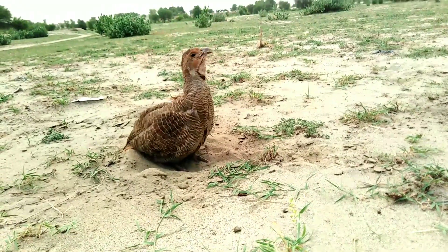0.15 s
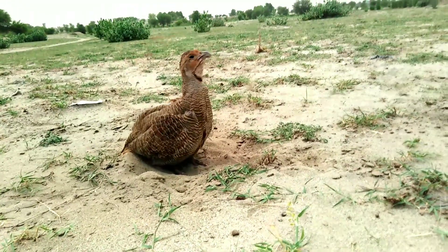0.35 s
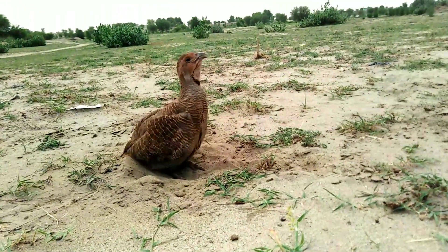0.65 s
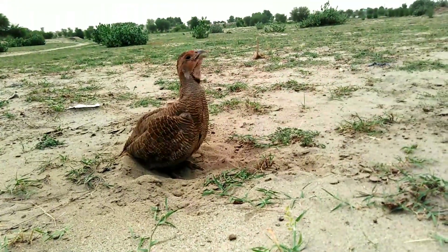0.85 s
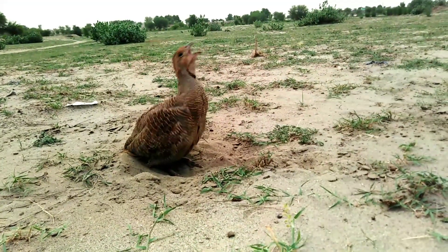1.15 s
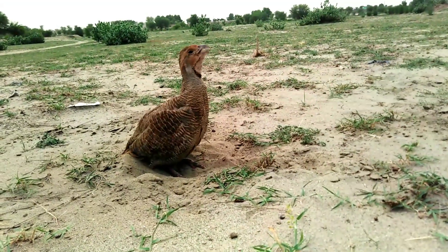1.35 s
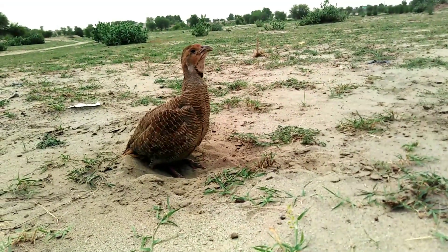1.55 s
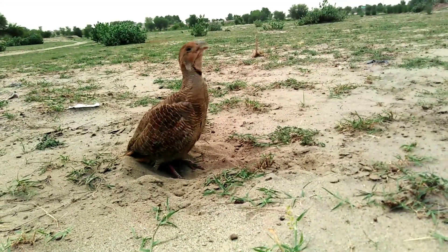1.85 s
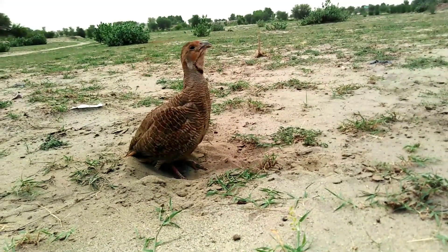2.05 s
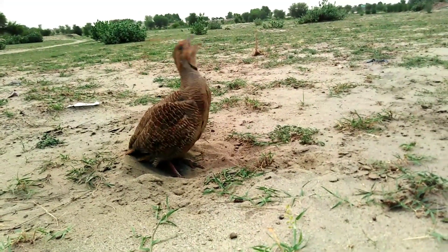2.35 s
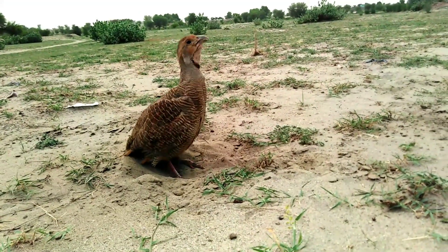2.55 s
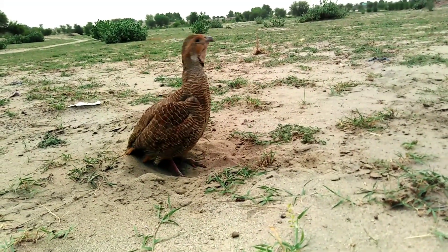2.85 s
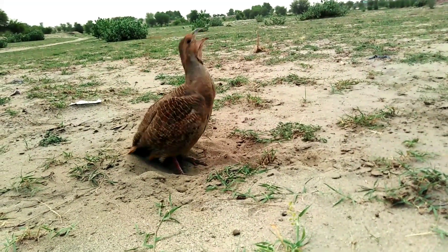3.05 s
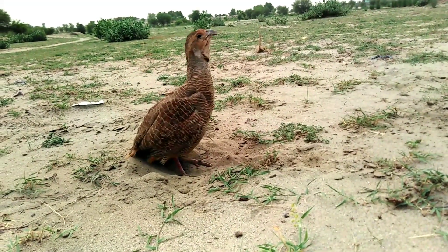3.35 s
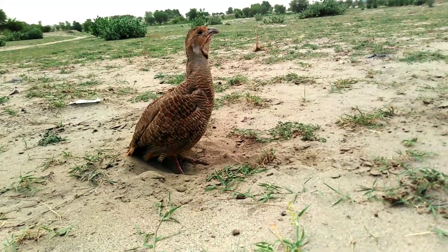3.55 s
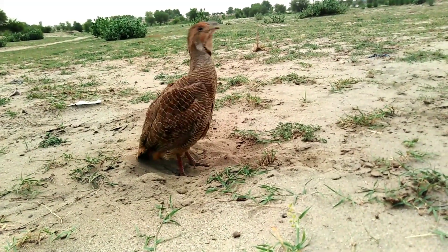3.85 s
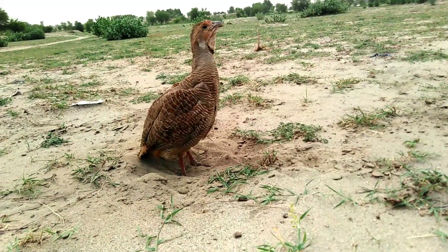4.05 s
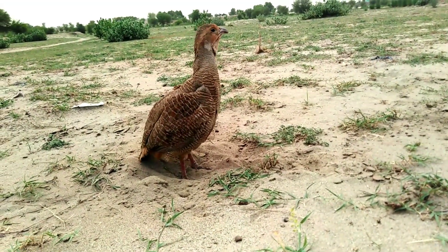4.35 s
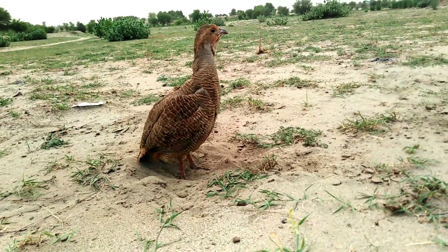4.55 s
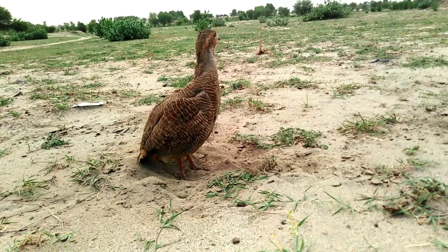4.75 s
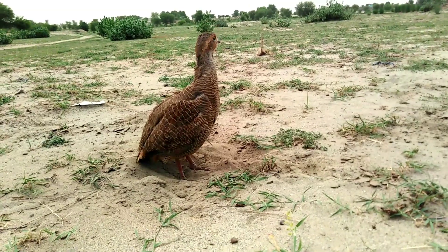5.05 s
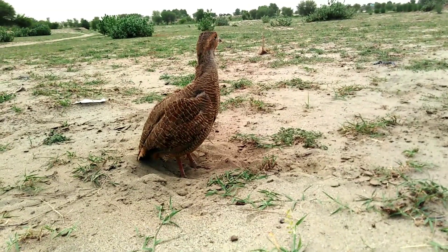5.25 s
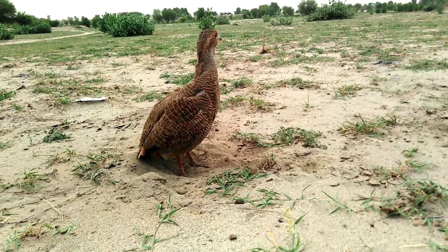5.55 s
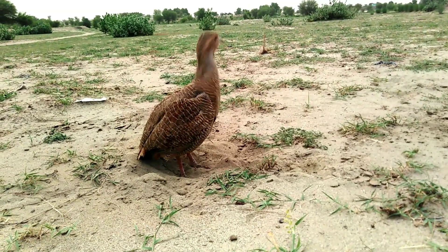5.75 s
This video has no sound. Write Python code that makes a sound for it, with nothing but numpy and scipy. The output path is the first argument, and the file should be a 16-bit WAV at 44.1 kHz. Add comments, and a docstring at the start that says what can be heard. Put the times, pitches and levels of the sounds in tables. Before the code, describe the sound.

Opening on the tail of a rasp, a francolin runs through rapid, strident call cycles on open sandy ground: cluck, grunt, piercing whistle, gritty rasp. The close stereo pickup is hot and slightly squashed, with little echo. The last cycle lacks the whistle and rasp, ending in a brief creak, then faint wind, insects and a far trill.

```python
"""Francolin on sandy ground

A grey francolin repeats a harsh cluck, a grunt, a loud whistle and a long rasp close by, then runs down to a low creak.
Harmonics, chaotic pitch and pulsed noise make the harsh voice; a wavering sine with a skirt of hiss makes the whistle.
Sand and field scatter the calls as decaying noise. Coloured noise makes the wind bumps, insects, wash and two grit
ticks, and a warbled sine makes a far bird's trill. The recorder's limiter holds each channel to full scale."""
import sys
import numpy as np
from scipy import signal
from scipy.fft import rfft, irfft, next_fast_len
from scipy.io import wavfile
from scipy.ndimage import uniform_filter1d, minimum_filter1d, map_coordinates

SR = 44100
rng = np.random.default_rng(int(sys.argv[2]) if len(sys.argv) > 2 else 0)


def digitize_waveform(pressure):
    """Quantize a signal to 16-bit integers and store it at the path in sys.argv[1].

    Rows of a 2-D input are taken as channels; values are limited to [-1, 1].
    """
    field = np.atleast_2d(pressure).T
    bounded = np.clip(field, -1, 1)
    quanta = np.round(bounded * 32767).astype(np.int16)
    wavfile.write(sys.argv[1], SR, quanta)


N = 261072  # length in samples

# Faint wash that hangs behind the calls and fades after them: t/s, level/dB
WASH_LEVEL = [(0, -52), (4.25, -53.5), (4.6, -63), (5.2, -76), (5.92, -72)]
# Colour of the wash: f/Hz, relative level/dB
WASH_COLOUR = [(300, 9), (900, 1), (2000, -1), (3500, -4), (6000, -2), (9000, -12), (14000, -10.5)]
# Colour of the insect band: f/Hz, relative level/dB
INSECT_COLOUR = [(1470, -66.5), (2500, -27), (3480, -24), (3640, -12.5), (4320, -18), (4480, -0.5),
                 (4750, -2), (5850, 0.5), (7160, -37.5), (14000, -29.5)]
# Swell of the wind: t/s, relative level/dB
WIND_LEVEL = [(0.0, -39), (0.16, -59), (0.92, -46), (1.02, -29.5), (1.52, -37.5), (1.65, -55.5),
              (1.83, -32.5), (2.77, -42), (3.59, -32.5), (3.94, -46.5), (4.39, -33), (4.65, -45.5),
              (4.7, -42), (4.83, -44), (5.31, -32), (5.75, -44), (5.8, -31), (5.92, -51)]
# Colour of the wind rumble: f/Hz, relative level/dB
RUMBLE_COLOUR = [(25, -36.5), (55, -5.5), (90, 3.5), (140, -1), (300, -24), (450, -35.5), (800, -53.5),
                 (1500, -60), (3000, -70.5), (8000, -87.5)]
# Soft low wind bumps: t/s, relative level/dB
WIND_BUMPS = [(1.34, -13), (4.422, -19.5), (4.694, -12.5), (4.717, -20), (5.23, -8), (5.488, -15),
              (5.807, -21.5)]
# Colour of a bump: f/Hz, relative level/dB
BUMP_COLOUR = [(40, -30.5), (100, 8.5), (190, 2.5), (330, -14.5), (700, -60), (1500, -62.0), (6000, -97)]
# Wind balance between the ports: f/Hz, left minus right level/dB
WIND_BALANCE = [(60, -23.5), (150, -17), (400, -10.5), (900, 0)]
# Grit ticks: t/s, relative level/dB
GRIT_TICKS = [(4.9061, -7.5), (4.948, -9)]
# Colour of a tick: f/Hz, relative level/dB
GRIT_COLOUR = [(410, -46), (700, -29), (756, -20), (5710, -6), (6830, 0.5), (10700, 1), (13500, -2.5),
               (14900, -23)]
# Far bird: start t/s, end t/s, centre f/Hz, level/dB halfway through a warble
FAR_TRILLS = [(4.246, 4.377, 2620, -55), (4.676, 4.786, 2673, -53.5), (5.901, 5.99, 2350, -58.5)]
# Decay of the field scatter: f/Hz, t60/s
FIELD_DECAY = [(200, 0.53), (1000, 1), (3000, 0.15), (5000, 0.35), (12000, 0.73)]
# Colour of the field scatter: f/Hz, relative level/dB
FIELD_COLOUR = [(150, -4.5), (500, 16.5), (1100, 12), (2000, -5), (3200, 12), (5000, 7.5), (7000, -2),
                (9000, -6.5), (12000, -2.5)]
# Rough sand scatters the treble most: f/Hz, level under the direct call/dB
SAND_SCATTER = [(1000, -15), (4500, -6), (8000, 1.5), (13000, -3.5)]
# Colour difference of the ports for the harsh calls: f/Hz, left minus right level/dB
PORT_BALANCE = [(60, -13.5), (110, -5), (200, -15.5), (370, -2.5), (690, 3), (1260, -8), (2320, -7),
                (4280, 8.5), (7870, -12), (14500, -8)]
# Phase difference of the ports for the harsh calls: f/Hz, left lead/rad
PORT_PHASE = [(0, 0), (1200, -2.3), (1600, -3.7), (1800, -6.6), (2750, -7), (3250, -8.8), (4000, -9.7),
              (6000, -12.7), (7000, -15.2), (9100, -19.2), (10200, -25), (14600, -32.5)]

# Whistles: start t/s, release t/s, end t/s, base f/Hz, waver f/Hz, upward step t/s, step f/Hz
WHISTLES = [(0.323, .46, .508, 3516, 29, .469, 346), (0.952, 1.137, 1.22, 3432, 4, 1.105, 136.3),
            (1.592, 1.756, 1.79, 3517, 2, 1.69, 80.3), (2.21, 2.368, 2.408, 3596, 25, 2.41, 117),
            (2.843, 2.862, 2.886, 3563, -0.5, 2.857, 203), (2.88, 3.084, 3.1, 3534, -15.5, 2.4, 30),
            (3.569, 3.777, 3.825, 3457, 6.5, 3.687, 133.3)]
# Colour of the hiss that rides on the whistle: f/Hz, relative level/dB
WHISTLE_HISS = [(300, -15.5), (1700, -8.5), (2400, -11), (3000, 6), (4000, -2), (4350, -8), (5100, 2),
                (6100, -4), (6800, -11.5), (9000, -20), (14000, -31.5)]

# The four harsh notes share columns: start t/s, end t/s, top f/Hz, relative level/dB, half-pitch undertone level/dB
# Clucks
CLUCKS = [(.168, .236, 1950, -12.5, -13.5), (.784, .852, 2079, -11.5, -31),
          (1.405, 1.478, 2130, -12.5, -28.5), (2.025, 2.098, 2112, -13, -30.5),
          (2.674, 2.748, 2093, -13.5, -23.5), (3.363, 3.437, 2052, -13.5, -20.5),
          (4.043, 4.12, 2046, -13.5, -26.5)]
# Softer, swelling grunts, most of which lead into a whistle
GRUNTS = [(.286, .345, 1252, -14, -11), (.907, .972, 1961, -10, -9.5), (1.531, 1.597, 2022, -9.5, -22),
          (2.153, 2.218, 2004, -10, -9.5), (2.803, 2.876, 1919, -11.5, -19), (3.491, 3.56, 1876, -13, -5.5),
          (4.173, 4.243, 1797, -14.5, -3.5)]
# Long rasping notes
RASPS = [(-.107, .06, 2486, -11, -27.5), (.505, .669, 2515, -10, -46.5), (1.116, 1.288, 2496, -9.5, -51),
         (1.738, 1.906, 2503, -8, -40), (2.388, 2.556, 2496, -9.5, -35.5), (3.074, 3.246, 2483, -10, -39.5),
         (3.758, 3.931, 2489, -10, -33.5)]
# The closing low creak
CREAK = [(4.323, 4.381, 370.1, -28, -15)]
# Throat resonances with the beak half open: f/Hz, relative level/dB
HALF_OPEN_BEAK = [(300, -7), (650, -16.5), (950, -4.5), (1250, -5.5), (1550, 3.5), (2100, -2),
                  (2500, -10.5), (3000, 3), (3550, -7), (4100, -2), (4750, -10), (5750, 1), (6700, -21),
                  (8600, -42), (10000, -13.5), (14500, -36.5)]
# Throat resonances with the beak wide open: f/Hz, relative level/dB
OPEN_BEAK = [(300, -30), (750, -23), (1400, 4), (1800, -0.5), (2300, 3), (3300, -6), (4200, -0.5),
             (5300, 1.5), (6500, -12.5), (7400, -15.5), (8400, -36.5), (9900, -19), (12300, -25.5),
             (14500, -30.5)]
# Throat resonances with the beak nearly shut: f/Hz, relative level/dB
SHUT_BEAK = [(220, -23), (370, 4.5), (560, -10), (1050, 5), (1600, 1.5), (2200, -21), (2700, -11.5),
             (3200, -27), (3800, -11), (4500, -40), (12000, -38)]
# Turbulence in the syrinx, brighter than the tone: f/Hz, relative level/dB
AIR_COLOUR = [(250, -22), (900, -9.5), (2000, -3.5), (5800, 18), (6700, -8.5), (7900, 10), (8600, -22),
              (9700, 0.5), (12300, 10), (14500, -19)]
# Stretches where the chaotic voice locks to a pitch, columns: from/share of note, to/share of note,
# pitch before the sag/top pitch, added level/dB, roughness/0-1
# Clucks
CLUCK_LOCKS = [(.15, .26, .5, 2, .36), (.3, .46, .78, 3.5, .17), (.54, .84, 0.99, 4, .05)]
# Grunts
GRUNT_LOCKS = [(.35, .49, .71, 0.045, 0.19), (.55, .85, 0.97, 0.86, .09)]
# Rasps
RASP_LOCKS = [(.055, .125, .72, 6.3, .16), (.275, .425, 0.99, 11, .03), (.595, .895, 0.97, 5.5, 0.022)]
# Pitch arches, columns: starting pitch/top pitch, peak/share of note, sag/share of pitch, power of the sag,
# release/share of note, final pitch/pitch at release
# Clucks
CLUCK_ARCH = (.22, .6, .14, 2.2, .85, .15)
# Grunts
GRUNT_ARCH = (.15, .6, .11, 2.4, .86, .18)
# Rasps
RASP_ARCH = (.95, .62, .165, 1.3, .895, .22)
# The creak
CREAK_ARCH = (.63, .35, .38, 1.8, .88, .88)

GUSTINESS_DB, BUMP_ATTACK_S = 2.5, .006  # quick random swings of the wind, rise of a bump
TRILL_FLUTTER_DB = 4  # the far bird is softer at the top of each warble
TOP_HZ = 14450  # upper band limit of the voice and the recorder
WHISTLE_DB, WHISTLE_EDGE_S, WHISTLE_FADE_DB_PER_S = -4, 0.014, 259  # held tone at the left port, end ramps, release
WHISTLE_TAIL_DB = -7.5  # after its release a whistle lingers this far under its held level, under the rasp
SCOOP_HZ, SCOOP_S, CLIMB_HZ_PER_S = 64, 0.018, 67  # a whistle slides up into its pitch, then creeps higher
WAVER_S, STEP_S = 0.084, .02  # period of the slow waver, half-length of the upward step
# The right port lies in a notch that the whistle climbs out of: level against the left at a pitch, and its rise
RIGHT_DB, RIGHT_AT_HZ, RIGHT_DB_PER_HZ = -15, 3509, 0.02
LOCK_EDGE = .035  # share of the note that locking on or off takes
NOTE_SPREAD = 0.011  # typical random shift of a note's middle, as a share of its length
AIR_WITH_CHAOS_DB = 6.5  # extra turbulence at full roughness
CHAOS_NOISE = .25  # noise share of power in a rasp at full roughness


def amp(db):
    """Decibels to gain."""
    return 10 ** (np.asarray(db) / 20)


def unit(x):
    """Scale to rms 1."""
    return x / np.sqrt(np.mean(x ** 2) + 1e-20)


def along(points, hz):
    """Read (f/Hz, value) points on a log frequency axis."""
    f, v = np.transpose(points)
    return np.interp(np.log(hz + 1), np.log(f + 1), v)


def curves(rows, at):
    """Join each column after the first by straight lines."""
    s, *cols = np.transpose(rows)
    return [np.interp(at, np.sort(s), c) for c in cols]


def wobble(rate, size):
    """A smooth random curve with rate knots a second."""
    knots = rng.standard_normal(int(size * rate / SR) + 4)
    return map_coordinates(knots, [np.arange(size) * rate / SR])


def filtered(x, response):
    """Shape x by a response over frequency."""
    size = x.shape[-1]
    m = next_fast_len(size + 4096)  # padding leaves room for the filter's ring
    return irfft(rfft(x, m) * response(np.fft.rfftfreq(m, 1 / SR)), m)[..., :size]


def noise(spectrum, shape):
    """Coloured noise of rms 1."""
    return unit(filtered(rng.standard_normal(shape), lambda hz: amp(along(spectrum, hz))))


def add(track, s, x):
    """Mix x into the track from time s on, cut at the track's ends."""
    i = round(s * SR)
    a, b = max(i, 0), min(i + x.shape[-1], N)
    track[..., a:b] += x[..., a - i:b - i]


def panned(db):
    """Left and right gains of mean power 1, from left minus right dB."""
    g = np.array([amp(db / 2), amp(-db / 2)])
    return g / np.sqrt(np.mean(g ** 2, axis=0))


def wash():
    """Soft, slightly uneven broadband hiss."""
    db = curves(WASH_LEVEL, np.arange(N) / SR)[0]
    return amp(db + 1.2 * wobble(37, N)) * noise(WASH_COLOUR, (2, N))


def insects(db=-65):
    """A nearly steady band of noise from far insects."""
    return amp(db + .8 * wobble(7.4, N)) * noise(INSECT_COLOUR, (2, N))


def wind(bump_t60=0.062):
    """Unrelated low buffeting at each port, mostly the right one, with a few soft bumps."""
    db = curves(WIND_LEVEL, np.arange(N) / SR)[0]
    out = amp(db + 2.5 + GUSTINESS_DB * wobble(22, N)) * noise(RUMBLE_COLOUR, (2, N))
    t = np.arange(SR // 6) / SR
    bump_envelope = (1 - np.exp(-(t / BUMP_ATTACK_S) ** 2)) * amp(-60 * t / bump_t60)
    for s, bump_db in WIND_BUMPS:
        push = noise(BUMP_COLOUR, (2, len(t)))
        add(out, s, amp(bump_db + 4.0) * push * bump_envelope)
    return filtered(out, lambda hz: panned(along(WIND_BALANCE, hz)))


def far_bird(trill_hz=39, swing_hz=230):
    """A faint sine whose pitch warbles quickly and whose level dips at each high."""
    out = np.zeros(N)
    for start, end, centre_hz, db in FAR_TRILLS:
        t = np.arange(int((end - start) * SR)) / SR
        beat = np.sin(2 * np.pi * trill_hz * t + .5 * wobble(30, len(t)))
        hz = centre_hz + swing_hz * beat + 40 * wobble(533, len(t))
        tone = np.sin(2 * np.pi * np.cumsum(hz) / SR)
        add(out, start, amp(db - TRILL_FLUTTER_DB * beat) * tone * signal.windows.tukey(len(t), .3))
    return np.array([out, out])


def grit(t60=0.0063):
    """Two sharp, fast-dying noise ticks, near the right port."""
    out = np.zeros((2, N))
    t = np.arange(SR // 20) / SR
    for s, db in GRIT_TICKS:
        tick = noise(GRIT_COLOUR, (2, len(t))) * amp(-60 * t / t60)
        add(out, s, amp(db - 2) * tick / np.abs(tick).max(axis=1, keepdims=True))
    return out * panned(-23)[:, None]


def field(x):
    """Scatter from ground and bushes: a noise tail that decays at its own rate in each band."""
    hz, t, z = signal.stft(rng.standard_normal((2, SR)), SR, nperseg=256)
    z = z * amp(along(FIELD_COLOUR, hz)[:, None] - 60 * t / along(FIELD_DECAY, hz)[:, None])
    tail = signal.istft(z, SR, nperseg=256)[1]
    return signal.fftconvolve(x, tail / np.linalg.norm(tail[0]), axes=1)[:, :N]


def ground(x, t60=0.037):
    """Rough sand scatters the call briefly to each port; the pattern drifts as the bird moves its head."""
    t = np.arange(SR // 16) / SR
    scatter = rng.standard_normal((2, 2, len(t))) * amp(-60 * t / t60)
    scatter = scatter / np.linalg.norm(scatter, axis=2, keepdims=True)
    one, other = signal.fftconvolve(x[None], scatter, axes=2)[..., :N]
    turn = 2 * wobble(2.4, N)  # radians of blend between the two patterns
    drifting = np.cos(turn) * one + np.sin(turn) * other
    return x + filtered(drifting, lambda hz: amp(along(SAND_SCATTER, hz)))


def at_ports(x):
    """The two ports hear the bird with different delay and colour."""
    def response(hz):
        lead = curves(PORT_PHASE, hz)[0]
        return panned(along(PORT_BALANCE, hz)) * np.exp(1j * lead * np.array([[1], [0]]))
    return filtered(x, response)


def whistles(lag_s=0.00037, hiss_db=-26):
    """A nearly pure tone that climbs slowly, in most whistles with an upward step, and carries a skirt of hiss."""
    out = np.zeros((2, N))
    for start, release, end, base_hz, waver_hz, step_s, step_hz in WHISTLES:
        t = np.arange(int((end - start) * SR)) / SR
        hz = base_hz + CLIMB_HZ_PER_S * t - SCOOP_HZ * np.exp(-t / SCOOP_S)
        hz = hz - waver_hz * np.cos(2 * np.pi * t / WAVER_S)
        hz = hz + step_hz * (1 + np.tanh((start + t - step_s) / STEP_S)) / 2
        right_db = np.minimum(RIGHT_DB + RIGHT_DB_PER_HZ * (hz - RIGHT_AT_HZ), 0)
        hz = hz * (1 + 0.0055 * wobble(360, len(t)))
        # the left port lags the right
        phase = 2 * np.pi * (np.cumsum(hz) / SR - hz * np.array([[lag_s], [0]]))
        flutter_db = .25 * wobble(190, len(t)) + 0.48 * wobble(35, len(t))
        tone = np.sqrt(2) * np.sin(phase) * amp(right_db * np.array([[0], [1]]) + flutter_db)
        hiss = amp(hiss_db) * noise(WHISTLE_HISS, (2, len(t))) * panned(4.4)[:, None]
        fade_db = np.maximum(-WHISTLE_FADE_DB_PER_S * np.maximum(start + t - release, 0), WHISTLE_TAIL_DB)
        gate = np.clip(np.minimum(t, t[-1] - t) / WHISTLE_EDGE_S, 0, 1)
        add(out, start, gate * amp(WHISTLE_DB + fade_db) * (tone + hiss))
    return out


def note_shape(locks, start_ratio, peak, sag, bend, release, end_ratio,
               attack, attack_db, sag_db, release_db, rough):
    """One push of air: pitch peaks, sags and collapses in the release; the voice is rough except where it locks.

    Times are shares of the note. Gives rows: share, pitch/top pitch, level/dB, roughness/0-1."""
    u = np.linspace(0, 1, 400)
    ratio = np.interp(u, [0, peak], [start_ratio, 1])
    sagging = np.interp(u, [peak, release], [0, 1])
    collapse = np.interp(u, [min(release, .98), 1], [0, 1])
    db = attack_db * np.exp(-u / attack) + sag_db * sagging + release_db * collapse
    for begin, end, lock_ratio, lock_db, lock_rough in locks:
        inside = np.minimum(u - begin, end - u) / LOCK_EDGE
        locked = np.clip(inside + .5, 0, 1)
        pitch_locked = np.clip(2 * inside + 2, 0, 1)  # the pitch jumps while the voice is still rough
        ratio = ratio + pitch_locked * (lock_ratio - ratio)
        rough = rough + locked * (lock_rough - rough)
        db = db + locked * lock_db
    ratio = ratio * (1 - sag * sagging ** bend) * end_ratio ** collapse
    return np.transpose(np.broadcast_arrays(u, ratio, db, rough))


def octaves_above(hz):
    """Octaves over the main resonance, zero below it."""
    return np.log2(np.maximum(hz / 2200, 1))


def notes(table, shape, tract, jitter, jitter_rate, flutter_db, rasp, air_db, tilt_db, dull):
    """The syrinx jumps between clean and chaotic vibration; its harmonics sweep through the fixed throat."""
    out = np.zeros(N)
    for start, end, top_hz, db, under_db in table:
        size = int((end - start) * SR)
        u = np.linspace(0, 1, size)
        shift = NOTE_SPREAD * rng.standard_normal() * np.sin(np.pi * u) ** 2
        ratio, level_db, rough = curves(shape, u + shift)
        chaotic = np.clip(rough - .08, 0, 1)  # below this threshold the vibration locks to a clean pitch
        hz = top_hz * np.abs(ratio) * np.exp(jitter * chaotic * wobble(jitter_rate, size))
        phase = 2 * np.pi * np.cumsum(hz) / SR

        # less effort dulls the voice; roughness tilts its treble too
        effort_db = db + level_db + 8.5
        slope_db = dull * np.maximum(effort_db, -12) + tilt_db * rough  # dB per octave

        # odd multiples of half the pitch appear when every second cycle is weaker
        k = np.arange(1, 41)[:, None] / 2
        partial_hz = k * hz
        partial_db = along(tract, partial_hz) + slope_db * octaves_above(partial_hz) + (k % 1 > 0) * under_db
        gain = amp(partial_db) * (partial_hz < TOP_HZ)
        gain = gain / np.sqrt(np.sum(gain ** 2, axis=0) / 2)
        tone = np.sum(gain * np.sin(k * phase + rng.uniform(0, 2 * np.pi, k.shape)), axis=0)
        tone = tone * amp(flutter_db * rough * wobble(700, size))

        gate = 1 + np.cos(phase)  # turbulence is let through once a cycle
        noise_share = np.clip(rasp * rough ** 2, 0, 1)
        chaos_colour = [(f, g + slope_db.mean() * octaves_above(f)) for f, g in tract]
        chaos = np.sqrt(noise_share) * noise(chaos_colour, size)
        air = amp(air_db + dull * effort_db + AIR_WITH_CHAOS_DB * rough) * noise(AIR_COLOUR, size)
        voice = np.sqrt(1 - noise_share) * tone + gate * (chaos + air)
        add(out, start, amp(db + level_db) * voice)
    return out


def harsh_calls():
    """Clucks, grunts, rasps and the closing creak: one syrinx with a pitch arch and beak opening for each."""
    cluck = note_shape(CLUCK_LOCKS, *CLUCK_ARCH, attack=0.047, attack_db=-33.5, sag_db=-3.5,
                       release_db=-24, rough=.52)
    grunt = note_shape(GRUNT_LOCKS, *GRUNT_ARCH, attack=0.092, attack_db=-23, sag_db=-5.5,
                       release_db=-17.5, rough=.58)
    rasp = note_shape(RASP_LOCKS, *RASP_ARCH, attack=.025, attack_db=-13.5, sag_db=-3.5,
                      release_db=-17, rough=0.58)
    creaking = note_shape([], *CREAK_ARCH, attack=.04, attack_db=-10.5, sag_db=-4.0,
                          release_db=-8, rough=0.073)
    clucks = notes(CLUCKS, cluck, HALF_OPEN_BEAK, jitter=0.3, jitter_rate=800, flutter_db=6.0,
                   rasp=0.18, air_db=-21, tilt_db=0.5, dull=1.0)
    grunts = notes(GRUNTS, grunt, HALF_OPEN_BEAK, jitter=0.23, jitter_rate=1000, flutter_db=3,
                   rasp=0.027, air_db=-15.0, tilt_db=-3.5, dull=1.0)
    rasps = notes(RASPS, rasp, OPEN_BEAK, jitter=0.2, jitter_rate=440, flutter_db=10.5,
                  rasp=CHAOS_NOISE, air_db=-22, tilt_db=-4.0, dull=0.75)
    creak = notes(CREAK, creaking, SHUT_BEAK, jitter=0.07, jitter_rate=1100, flutter_db=17.0,
                  rasp=0.28, air_db=-37, tilt_db=-4.0, dull=0.107)
    return ground(at_ports(clucks + grunts + rasps + creak))


def scene():
    """The francolin in front, over field scatter, wash, wind, insects, a far bird and grit."""
    voice, whistle, far, ticks = harsh_calls(), whistles(), far_bird(), grit()
    echo = field(amp(-40.5) * voice + amp(-45.5) * whistle + far + amp(-21.0) * ticks)
    return voice + whistle + far + ticks + echo + wash() + wind() + insects()


def record(dry, ceiling=1.0):
    """A fast limiter turns each channel down around its peaks, then the band limit cuts the top."""
    need = np.minimum(1, ceiling / (np.abs(dry) + 1e-9))
    held = minimum_filter1d(need, size=130, axis=1)  # about 3 ms
    gain = uniform_filter1d(held, size=130, axis=1)
    return filtered(dry * gain, lambda hz: 1 / np.sqrt(1 + (hz / TOP_HZ) ** 120))


dry = scene()
out = record(dry)
digitize_waveform(out)
```